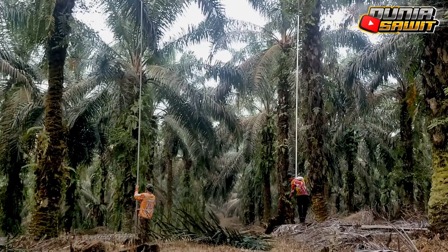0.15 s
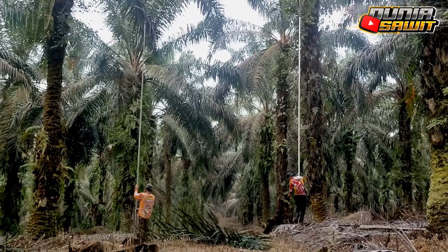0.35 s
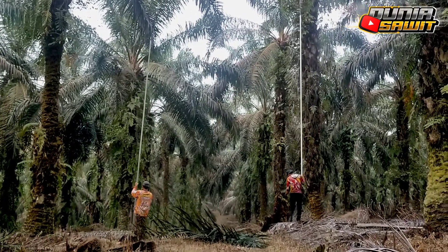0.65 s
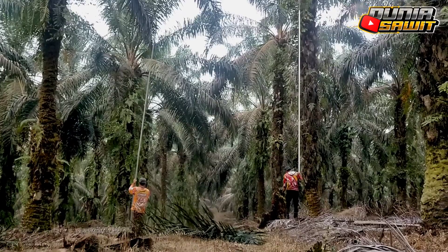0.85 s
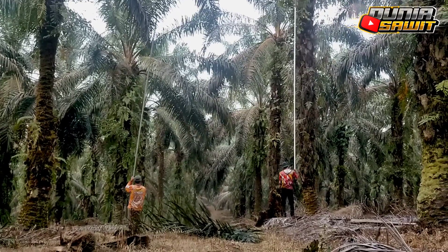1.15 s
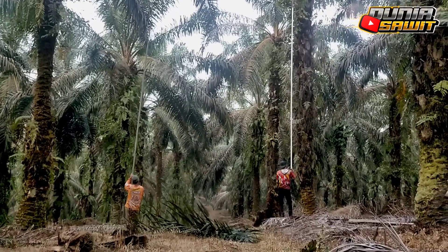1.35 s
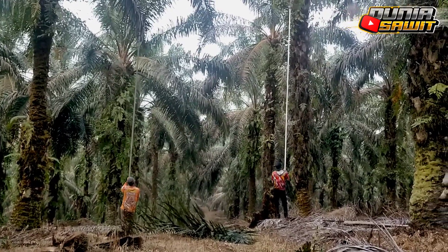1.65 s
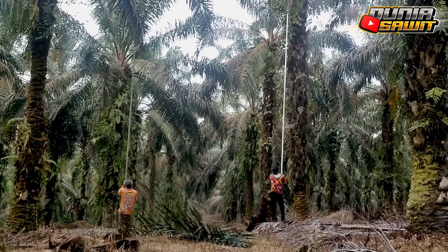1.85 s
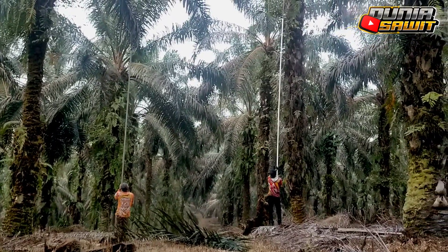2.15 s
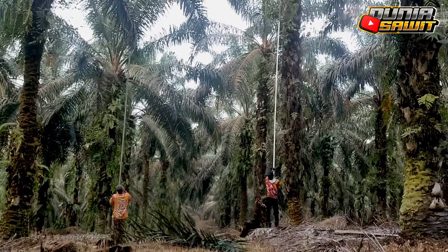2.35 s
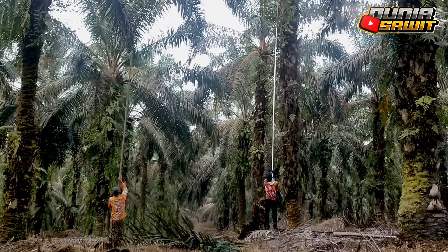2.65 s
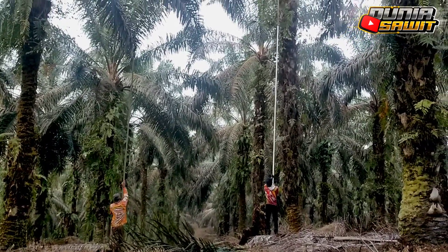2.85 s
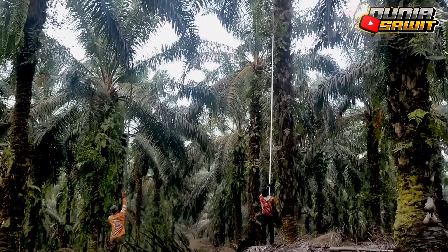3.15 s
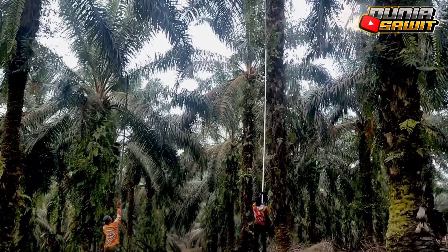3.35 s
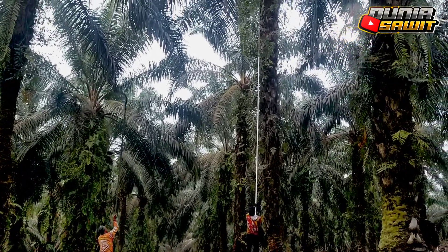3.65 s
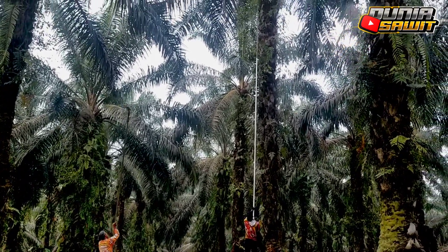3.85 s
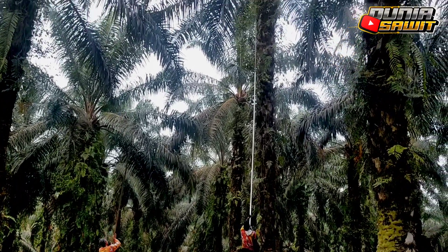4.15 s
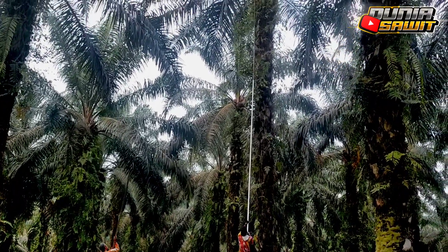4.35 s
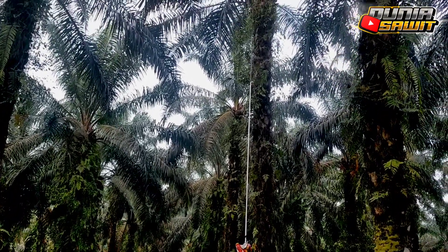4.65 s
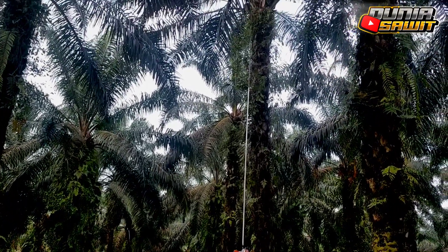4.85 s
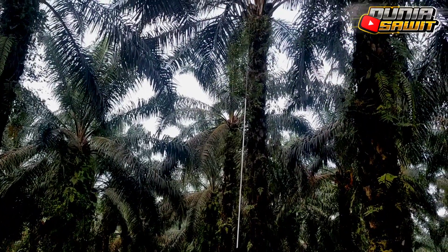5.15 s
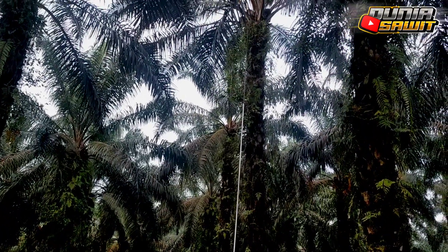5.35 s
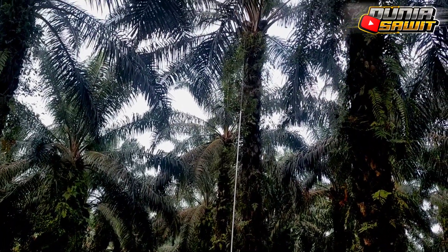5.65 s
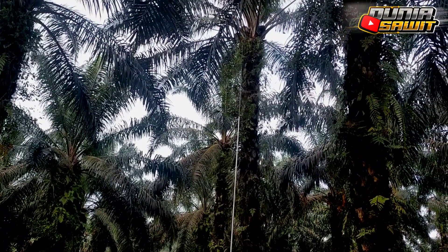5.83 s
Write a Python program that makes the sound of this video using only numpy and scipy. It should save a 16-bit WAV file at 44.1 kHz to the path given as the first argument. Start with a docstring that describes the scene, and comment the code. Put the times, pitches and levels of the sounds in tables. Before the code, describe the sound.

Insects shrill steadily in a palm grove while a long-poled blade scrapes overhead, then chops sharply with a metallic clink, followed by creaks and knocks.

```python
"""A sickle on a long pole works high in an oil palm, heard from the ground.
From the start insects buzz and chirp, modelled as a throbbing noise band and gliding notes, over low rumble.
The blade slides (fracture clicks, ringing steel), pulls tear fibres, dry pressure ticks fall near, a far bird calls.
Then come knocks (rung stalk modes) and a chop whose burst of breaks shakes the crown and leaves the blade clinking.
More pulls, squeaks, calls, ticks and knocks follow; the trunks scatter the sound back as sparse echoes."""
import sys
import numpy as np
from scipy import signal
from scipy.fft import rfft, irfft
from scipy.io import wavfile
from scipy.ndimage import uniform_filter1d

SR = 44100
rng = np.random.default_rng(int(sys.argv[2]) if len(sys.argv) > 2 else 0)


def master_out(mix):
    """Clip the mix to full scale and print it as 16-bit PCM to the path in sys.argv[1]."""
    frames = np.transpose(np.atleast_2d(mix))
    ceiling = np.clip(frames, -1, 1)
    pcm = np.round(ceiling * 32767).astype(np.int16)
    wavfile.write(sys.argv[1], SR, pcm)


N = 264159
TIME = np.arange(N) / SR  # seconds

# Spectra of the sources. Each row: frequency in Hz, relative level in dB.
AIR_SPECTRUM = [(20, 6), (60, 0.5), (140, 0), (220, -8), (350, -15.5), (700, -18.5), (1600, -19),
                (2050, -16.5), (2400, -15.5), (3300, -18), (5000, -20), (7000, -26.5), (8300, -25),
                (11000, -31.5), (15500, -28)]
CHORUS_SPECTRUM = [(3000, -36), (3950, -11), (4400, 0), (5000, -2), (5600, -3.5), (6200, -12), (7200, -26),
                   (9000, -45)]
SLIDE_SPECTRUM = [(200, -34), (600, -22), (1000, -12.5), (1600, -5.5), (2400, -2.5), (3300, -3.5),
                  (4500, -2), (6800, -8), (7600, -8.5), (8400, 10), (9100, 2), (10300, -6), (13000, 1),
                  (15500, 3.5)]
STALK_SPECTRUM = [(150, -29), (420, -4), (620, -13.5), (900, 1.5), (1120, -0.5), (1500, -8), (2500, -21.5),
                  (5000, -37)]
RUSTLE_SPECTRUM = [(300, -6), (1200, 0), (2400, 10), (3300, 7), (4500, 2), (6500, 1), (8300, 4),
                   (11000, -2), (15500, 2)]
SPLINTER_SPECTRUM = [(400, -22), (900, -24), (1500, -13), (2800, 6), (4000, -1), (6000, -10.5), (8300, -8),
                     (11000, -18), (15500, -16)]
FROND_SPECTRUM = [(400, -20), (1100, 6.5), (2100, 5), (3200, -3), (6000, -14), (15500, -26)]
CHOP_SPECTRUM = [(100, -46), (190, -41), (280, -22), (380, -49), (540, -18), (760, 0), (1050, -5.5),
                 (1600, 1.5), (2400, -8), (3300, -10), (5000, -10), (6800, -15.5), (8300, -4.5),
                 (10500, -16), (15500, -7)]
CROWN_SPECTRUM = [(300, -23), (700, -7), (1100, -8), (1600, -8), (2200, 3), (3300, -4), (4500, -12),
                  (6500, -10), (8500, -9), (11000, -22), (15500, -24)]

# Modes of the steel blade, of its high edge sound, and the upper modes of the stalk.
# Each row: frequency in Hz, bandwidth in Hz, relative level in dB.
BLADE_MODES = [(478, 13, -23), (655, 17, -14.5), (1199, 25, -13.5), (1660, 90, -9), (2078, 13, -19),
               (2213, 22, -9.5), (2420, 35, -17), (2500, 25, -12), (2760, 12, -21), (2824, 25, -4),
               (2770, 40, -10), (6360, 93, -10), (8480, 110, -14), (8130, 61, -5.5)]
EDGE_MODES = [(8140, 480, 0), (8700, 600, -2)]
UPPER_STALK_MODES = [(1644, 215, 1.5), (2260, 680, -1.5)]

# Scattering by the grove. Each row: frequency in Hz, time to decay by 60 dB in seconds.
ECHO_T60 = [(200, .35), (700, 0.52), (2000, 0.63), (5000, 0.95), (8000, 0.63), (14000, 0.47)]
# Spectrum of the echoes. Each row: frequency in Hz, relative level in dB.
ECHO_SPECTRUM = [(200, -10), (700, -3.5), (1100, -4), (1600, 5), (2300, 4), (2800, 0), (3700, 2.5),
                 (8000, -2.5), (14000, -4.5)]

# Many far insects: level at the start in dB, and its fall in dB per second.
CHORUS_DB, CHORUS_FADE_DB_PER_S = -64.5, 0.35

# Strokes of the blade along a frond. Each row: start in seconds, rise in seconds, hold in seconds,
# relative scrape level in dB, relative level of the singing steel in dB.
STROKES = [(-.2, .28, 0.55, -54.5, -67.5), (1.22, .14, 0.1, -72, -87), (1.693, 0.013, 0.21, -66.5, -67)]
PRESS_DB_PER_S, STROKE_RELEASE_S = 4, 0.07  # pressure grows during the hold, then lets go

# Runs of an insect's falling double chirps. Each row: first pair in seconds, last pair in seconds, level in dB.
CHIRP_RUNS = [(-.011, 0.488, -60), (.531, 0.634, -61), (0.696, 0.901, -60), (1.591, 1.9, -60.5),
              (2.878, 3.292, -59.5), (3.308, 3.364, -59)]
CHIRP_EVERY_S, PAIR_GAP_S, FIRST_OF_PAIR_DB = .0516, .015, -2  # pairs are spread evenly over a run

# Bouts of a higher caller, in phrases of three falling chirps. Each row: start in seconds, stop in seconds,
# level in dB.
HIGH_BOUTS = [(0.026, .37, -61.5), (2.092, 3.82, -61.5)]
PHRASE_EVERY_S, HIGH_GAP_S, LEAD_IN_DB = .2391, .04, -10.5  # the first chirp of a phrase is faint

# Pulls on the hook. Each row: start in seconds, rise in seconds, hold in seconds,
# relative creak level of the stalk in dB, relative rustle level in dB.
PULLS = [(0.508, .025, .03, -66, -67), (2.58, .07, .08, -67.5, -75.5), (2.74, 0.012, .05, -62.5, -68.5),
         (2.86, .11, 0.11, -74.5, -74), (3.573, 0.069, .035, -50, -56), (3.71, .02, 0.0044, -61, -75),
         (4.276, .025, .007, -62, -75), (4.347, 0.066, 0.076, -87, -75),
         (4.472, 0.048, 0.022, -54.5, -72.5), (4.72, .06, 0.017, -74, -74.5),
         (5.221, 0.0081, 0.046, -67, -69)]
CREAK_RELEASE_S, RUSTLE_RELEASE_S = 0.015, 0.077

# Squeaks of the hooked stalk. Each row: start in seconds, length in seconds, first frequency in Hz,
# last frequency in Hz, level in dB.
SQUEAKS = [(2.569, 0.028, 1070, 990, -70), (2.681, .04, 720, 754, -71), (2.773, 0.027, 890, 820, -69.5),
           (3.612, 0.037, 1082, 1110, -58), (3.644, 0.031, 1167, 1125, -52.5),
           (3.674, 0.011, 1170, 900, -49), (3.725, 0.015, 1097, 920, -55),
           (4.452, 0.032, 1145, 1080, -67.5), (4.52, .02, 998, 920, -56.5), (5.244, 0.047, 922, 828, -63.5),
           (5.291, 0.03, 1035, 1220, -63)]

# Dry ticks nearby. Each row: time in seconds, peak level in dB, frequency in Hz.
TICKS = [(.843, -42, 8000), (1.049, -47, 8000), (1.081, -39, 7450), (1.1162, -39, 1330), (2.329, -55, 695),
         (3.2812, -39, 1250), (3.9608, -38.5, 1090), (4.068, -49, 1235), (4.193, -51, 1100),
         (5.1359, -40, 1190), (5.437, -43.5, 1000), (5.4662, -41, 1100)]

# A far bird's twitter. Each row: start in seconds, length in seconds, first frequency in Hz,
# last frequency in Hz, relative level in dB.
TWITTERS = [(.87, .06, 2550, 2500, -64), (.985, 0.055, 2450, 2464, -61), (1.335, 0.046, 2004, 1510, -66),
            (3.02, .08, 2400, 2710, -61.5), (3.242, .04, 2600, 2670, -64), (3.321, 0.049, 2800, 2490, -58),
            (3.395, 0.045, 2650, 2590, -59.5), (4.009, 0.097, 2750, 2700, -64),
            (4.077, .11, 3300, 3030, -67)]
# Long trills about one pitch. Each row: start in seconds, length in seconds, relative level in dB.
TRILLS = [(3.453, 0.11, -60.5), (3.829, 0.142, -66), (4.206, 0.15, -66), (4.759, 0.32, -71),
          (5.536, 0.19, -71)]
TRILL_HZ = 2376
# A small bird's thin rising whistles. Each entry: start in seconds.
WHISTLES = [2.68, 4.36, 4.945, 5.01]
WHISTLE_S, WHISTLE_FROM_HZ, WHISTLE_TO_HZ = .06, 5850, 6850
WHISTLE_RELATIVE_DB = -66.5

# Knocks of the hook on the stalk. Each row: time in seconds, relative level in dB, decay time in seconds,
# relative level of the hollow low mode in dB, relative splinter level in dB.
KNOCKS = [(1.698, -55.5, 0.025, 3, -6), (1.79, -63, 0.047, -2, -4), (2.754, -61.5, 0.0064, 0, 7),
          (4.297, -58, 0.0085, 14, -12), (4.502, -60, 0.014, 18, -16), (5.329, -33, 0.0033, -34, -13),
          (5.8449, -47.5, 0.0092, 7, -15), (5.896, -50.5, 0.044, -0.5, -3)]

# The chop: the edge bites in, the stalk breaks, and the last fibres part.
CHOP_S, BITE_S, BREAK_S, SNAP_S = 1.947, .011, 0.021, 0.0021  # time of the break, then durations
# Clinks of the loose blade after the chop. Each row: time in seconds, relative level in dB.
CLINKS = [(2.031, -41.5), (2.070, -50)]
CLINK_HZ, CLINK_DECAY_S = 7960, 0.0059

BAND_LIMIT_HZ = 15650


def amp(db):
    """Decibels are converted to an amplitude ratio."""
    return 10 ** (np.asarray(db) / 20)


def evened(x):
    """Normalisation: the root-mean-square value becomes 1."""
    return x / np.sqrt(np.mean(x ** 2) + 1e-20)


def read(points, hz):
    """Interpolation of a spectrum table on a logarithmic frequency axis."""
    f, value = np.transpose(points)
    return np.interp(np.log(hz + 1), np.log(f), value)


def add(mix, s, sound):
    """Superposition: a sound is summed into the mix from time s in seconds."""
    start = round(s * SR)
    sound = sound[max(-start, 0):]
    part = mix[max(start, 0):][:len(sound)]
    part += sound[:len(part)]


def colour(x, points):
    """Linear filtering by a spectrum table, preserving the power of white noise."""
    gain = evened(amp(read(points, np.fft.rfftfreq(len(x), 1 / SR))))
    return irfft(rfft(x) * gain, len(x))


def drift(hz):
    """Low-passed noise: slow random variation up to about the given rate, rms 1."""
    f = np.fft.rfftfreq(N, 1 / SR)
    spectrum = rfft(rng.standard_normal(N)) / (1 + (f / hz) ** 4)
    return evened(irfft(spectrum, N))


def mottle(x, patchy_db):
    """Time-frequency modulation: patches a few hundred Hz wide swell and fade, total power unchanged."""
    z = signal.stft(x, SR, nperseg=512)[2]
    across_hz = uniform_filter1d(rng.standard_normal(z.shape), 4, axis=0)
    patches = evened(uniform_filter1d(across_hz, 6, axis=1))
    patchy = signal.istft(z * amp(patchy_db * patches), SR, nperseg=512)[1][:N]
    return evened(patchy) * np.sqrt(np.mean(x ** 2))


def fractures(per_s, spread_db):
    """Shot noise: fibre breaks are random clicks of either sign and uneven size, rms 1."""
    size = amp(spread_db * np.minimum(rng.exponential(1, N), 4))
    sign = rng.choice([-1, 1], N)
    return evened(size * sign * (rng.random(N) < per_s / SR))


def ring(x, modes, order=1):
    """Modal resonance: a force drives damped modes; order 2 gives a softer start and steeper skirts."""
    t = np.arange(SR // 4) / SR
    out = 0
    for hz, width, db in modes:
        decay = t ** (order - 1) * np.exp(-np.pi * width * t)
        response = decay * np.sin(2 * np.pi * hz * t)
        out = out + amp(db) * evened(signal.oaconvolve(x, response)[:len(x)])
    return evened(out) * np.sqrt(np.mean(x ** 2))  # the driving power is kept


def glide(length, start_hz, end_hz, waver=0):
    """Frequency modulation: a half-sine-edged note glides in pitch and may waver."""
    n = int(length * SR)
    wobble = evened(uniform_filter1d(rng.standard_normal(SR), SR // 300))[:n]
    hz = np.linspace(start_hz, end_hz, n) * (1 + waver * wobble)
    edges = np.sin(np.pi * np.arange(n) / n)
    return evened_free(edges, hz)


def evened_free(edges, hz):
    """Phase is the integral of frequency; the note is then scaled to rms 1."""
    return evened(edges * np.sin(2 * np.pi * np.cumsum(hz) / SR))


def envelope(start, rise, hold, release):
    """Amplitude law: a quickening rise, a hold and an exponential release, all in seconds."""
    since = TIME - start
    fall = np.exp(-np.maximum(since - rise - hold, 0) / release)
    return np.clip(since / rise, 0, 1) ** 2 * fall


def stroke(start, rise, hold):
    """Contact pressure: the edge presses harder through the hold of one stroke."""
    growth_db = PRESS_DB_PER_S * np.clip(TIME - start - rise, 0, hold)
    return envelope(start, rise, hold, STROKE_RELEASE_S) * amp(growth_db)


def blow(bite_db, after_db, decay_s):
    """Impact force: a weaker bite, the break at full strength, and a dying remainder."""
    bite = amp(bite_db) * envelope(CHOP_S - BITE_S, BITE_S / 2, BITE_S / 2, SNAP_S)
    fracture = envelope(CHOP_S, SNAP_S, BREAK_S, SNAP_S)
    after = amp(after_db) * envelope(CHOP_S, SNAP_S, BREAK_S, decay_s)
    return np.maximum(fracture, np.maximum(bite, after))


def air():
    """Broadband noise: low outdoor rumble and a faint wash of leaves."""
    wash = mottle(colour(rng.standard_normal(N), AIR_SPECTRUM), patchy_db=1.93)
    return amp(-62.0) * wash * amp(.5 * drift(hz=5.5))


def chorus():
    """Amplitude modulation: many far insects merge into a band that throbs with their wing strokes."""
    wing_strokes = np.cumsum(76 * (1 + 0.0813 * drift(hz=6.1))) / SR  # cycles, at about 76 Hz
    throb = 1 + 0.15 * np.sin(2 * np.pi * wing_strokes)
    buzz = colour(rng.standard_normal(N), CHORUS_SPECTRUM) * throb * amp(0.76 * drift(hz=24.8))
    return evened(buzz) * amp(CHORUS_DB - CHORUS_FADE_DB_PER_S * TIME)


def slide():
    """Friction: the edge catches on fibres as it slides, and the steel rings faintly."""
    pressure = sum(amp(db) * stroke(start, rise, hold) for start, rise, hold, db, _ in STROKES)
    drive = fractures(per_s=6000, spread_db=2.0) * pressure * amp(0.94 * drift(hz=41))
    hiss = mottle(colour(drive, SLIDE_SPECTRUM), patchy_db=2.5)
    steel = ring(drive, BLADE_MODES)
    edge = ring(drive, EDGE_MODES, order=2)
    return amp(5.5) * hiss + amp(-19.0) * steel + amp(-6.5) * edge


def sing():
    """Beating: two close blade modes sound fitfully under a stroke and loudly in the chop, bent by the edge."""
    turn = 2 * np.pi * (TIME - CHOP_S)
    bend = 0.86 * drift(hz=45)  # radians
    rubbed = sum(amp(db) * stroke(start, rise, hold) for start, rise, hold, _, db in STROKES)
    rubbed = rubbed * drift(hz=22)
    struck = amp(-28) * blow(bite_db=-25, after_db=-9.5, decay_s=0.032) * amp(1.5 * drift(hz=60))
    modes = np.sin(2805 * turn + bend) + amp(-7.5) * np.sin(2746 * turn + bend)
    return modes * (rubbed + struck)


def chirps():
    """Periodic falling sweeps: one near caller chirps in quick pairs, a higher one in phrases of three."""
    out = np.zeros(N)
    for first, last, db in CHIRP_RUNS:
        for s in np.linspace(first, last, round((last - first) / CHIRP_EVERY_S) + 1):
            for side, accent_db in [(-1, FIRST_OF_PAIR_DB), (1, 0)]:
                level = amp(db + accent_db + 0.63 * rng.normal())
                add(out, s + side * PAIR_GAP_S / 2, level * glide(0.0155, 4513, 3870, waver=0.0066))
    for start, stop, db in HIGH_BOUTS:
        for phrase in np.arange(start, stop, PHRASE_EVERY_S):
            for k, accent_db in enumerate([LEAD_IN_DB, 0, 0]):
                s = phrase + k * HIGH_GAP_S
                if s < stop:
                    level = amp(db + accent_db + 0.79 * rng.normal())
                    add(out, s, level * glide(0.025, 5980, 4850, waver=0.0095))
    return out


def tear():
    """Fracture under tension: pulled fibres tear, the stalk creaks and squeaks, and leaflets rustle on longer."""
    out = np.zeros(N)
    creak = colour(fractures(per_s=1500, spread_db=2.5), STALK_SPECTRUM)
    rustle = colour(fractures(per_s=3000, spread_db=3.5), RUSTLE_SPECTRUM)
    for start, rise, hold, creak_db, rustle_db in PULLS:
        out += amp(creak_db - 3.0) * creak * envelope(start, rise, hold, CREAK_RELEASE_S)
        out += amp(rustle_db + 5.5) * rustle * envelope(start, rise, hold, RUSTLE_RELEASE_S)
    for s, length, start_hz, end_hz, db in SQUEAKS:
        add(out, s, amp(db) * glide(length, start_hz, end_hz, waver=0.058))
    return out


def ticks():
    """Pressure pulse: each tick is a single swing of pressure, a Gaussian's derivative."""
    out = np.zeros(N)
    t = np.arange(-SR // 200, SR // 200) / SR
    for s, db, hz in TICKS:
        u = 2 * np.pi * hz * t
        add(out, s + t[0], amp(db) * u * np.exp((1 - u ** 2) / 2))  # the swing peaks at u = 1
    return out


def bird():
    """Frequency and amplitude modulation: thin, trembling twitters, trills and whistles from far off."""
    out = np.zeros(N)
    for s, length, start_hz, end_hz, db in TWITTERS:
        add(out, s, amp(db) * glide(length, start_hz, end_hz, waver=0.051))
    for s, length, db in TRILLS:
        add(out, s, amp(db) * glide(length, TRILL_HZ, TRILL_HZ, waver=0.0326))
    for s in WHISTLES:
        whistle = glide(WHISTLE_S, WHISTLE_FROM_HZ, WHISTLE_TO_HZ, waver=.01)
        add(out, s, amp(WHISTLE_RELATIVE_DB) * whistle)
    tremble = evened(amp(5.1 * drift(hz=50.7)))
    return amp(-5.0) * out * tremble


def knocks():
    """Impact excitation: a short crunch rings the stalk and throws off splinters; the jolted frond rustles on."""
    out = np.zeros(N)
    t = np.arange(SR // 3) / SR
    for s, db, decay, hollow_db, splinter_db in KNOCKS:
        crunch = rng.standard_normal(len(t)) * np.exp(-t / decay)
        modes = [(1084, 240, hollow_db)] + UPPER_STALK_MODES  # blunt knocks stir the lowest mode
        wood = ring(crunch, modes, order=2)
        splinters = amp(splinter_db) * colour(crunch, SPLINTER_SPECTRUM)
        leaves = colour(rng.standard_normal(len(t)), FROND_SPECTRUM) * np.exp(-t / 0.059)
        add(out, s, amp(db) * (wood + splinters + amp(-21.5) * leaves))
    return out


def chop():
    """Brittle failure: the stalk gives way in a dense burst of breaks that rattles the blade."""
    force = blow(bite_db=-6.5, after_db=-7.5, decay_s=0.032)
    drive = fractures(per_s=12000, spread_db=1.5) * force
    return amp(-32.5) * colour(drive, CHOP_SPECTRUM) + amp(-38.0) * ring(drive, BLADE_MODES)


def shudder():
    """Damped agitation: the chop shakes the crown, whose dry leaflets crackle and settle."""
    since = np.clip(TIME - 1.968, 0, None)
    swell = (1 - np.exp(-since / 0.0053)) * np.exp(-since / 0.078)
    return amp(-42.0) * swell * colour(fractures(per_s=2000, spread_db=4.0), CROWN_SPECTRUM)


def clinks():
    """Free vibration: light touches ring a high mode of the blade, which decays exponentially."""
    tone = np.sin(2 * np.pi * CLINK_HZ * TIME)
    return tone * sum(amp(db) * envelope(s, SNAP_S, 0, CLINK_DECAY_S) for s, db in CLINKS)


def grove(x):
    """Multiple scattering: trunks and crowns return sparse echoes whose decay depends on frequency."""
    late = TIME[:SR] > .011  # the first echo comes after 11 ms
    taps = rng.standard_normal(SR) * (rng.random(SR) < 3000 / SR) * late
    hz, t, z = signal.stft(taps, SR, nperseg=256)
    decay_db = -60 * t / read(ECHO_T60, hz)[:, None]
    tone_db = read(ECHO_SPECTRUM, hz)[:, None]
    tail = signal.istft(z * amp(tone_db + decay_db), SR, nperseg=256)[1]
    return signal.fftconvolve(x, tail / np.linalg.norm(tail))[:N]


def scene():
    """Superposition of far work with its echoes, near ticks and chirps, and the steady background."""
    pull = slide() + tear() + shudder()
    steel = sing() + clinks()
    calls, notes, blows, cut = chirps(), bird(), knocks(), chop()
    direct = cut + steel + pull + blows + notes + calls
    scattered = amp(-7) * cut + amp(-13.5) * steel + amp(-11) * pull
    scattered += amp(-19) * blows + amp(-9.5) * notes + amp(-14) * calls
    return (direct + grove(scattered) + ticks() + chorus() + air())[None]


def record(dry):
    """Band limitation: a linear-phase low-pass filter removes the highest treble."""
    low_pass = signal.firwin(601, BAND_LIMIT_HZ, window=("kaiser", 9), fs=SR)
    return signal.oaconvolve(dry, low_pass[None], "same")


dry = scene()
out = record(dry)
master_out(out)
```